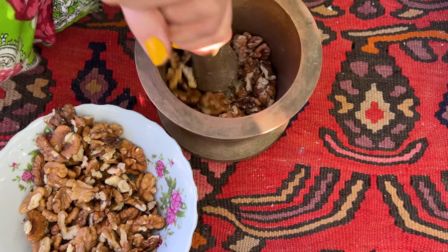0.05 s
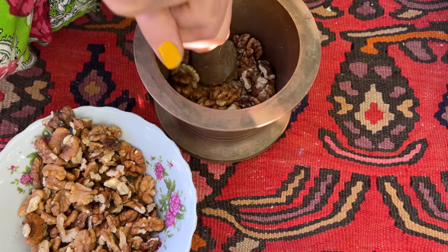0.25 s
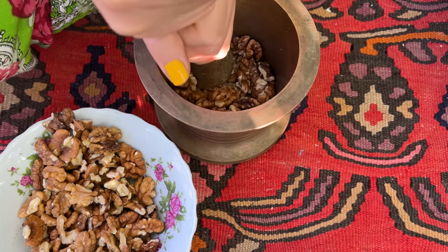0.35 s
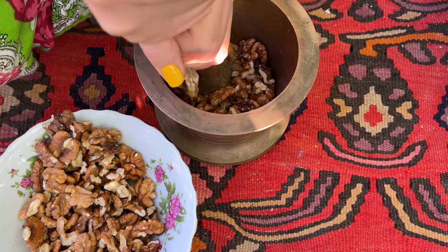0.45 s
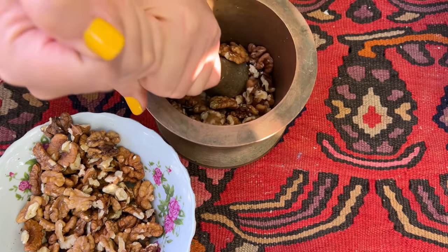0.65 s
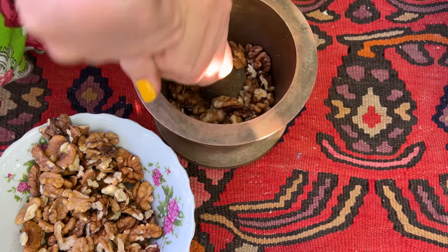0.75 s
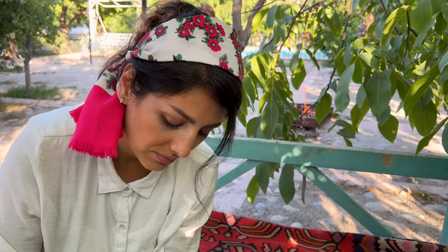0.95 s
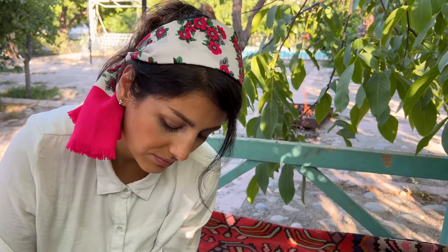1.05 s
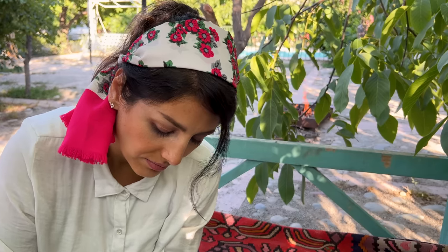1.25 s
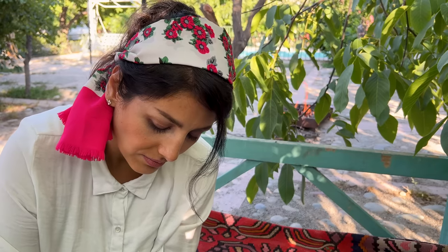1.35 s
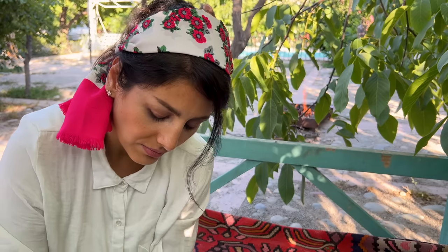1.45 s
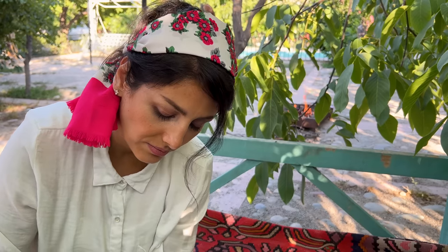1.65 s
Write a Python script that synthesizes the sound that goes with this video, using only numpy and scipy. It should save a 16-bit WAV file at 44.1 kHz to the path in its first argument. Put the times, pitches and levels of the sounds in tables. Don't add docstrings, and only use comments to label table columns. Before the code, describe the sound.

A pestle strikes a brass mortar of nuts, one hard scraping clang ringing over crunching shells

```python
import sys
import numpy as np
from scipy import signal
from scipy.fft import rfft, irfft, next_fast_len
from scipy.io import wavfile
from scipy.ndimage import uniform_filter1d, map_coordinates

SR = 44100
rng = np.random.default_rng(int(sys.argv[2]) if len(sys.argv) > 2 else 0)


def decibels_to_gain(level_db):
    exponent = np.asarray(level_db, float) / 20
    return 10 ** exponent


def wav_record(signal):
    frames = np.transpose(np.atleast_2d(signal))
    bounded = np.clip(frames, -1, 1)
    quanta = np.round(bounded * 32767).astype(np.int16)
    wavfile.write(sys.argv[1], SR, quanta)


N = 74970
LAG_S = 0.00017
SHADE_HZ = 7250


def unit(x):
    return x / np.sqrt(np.mean(x ** 2) + 1e-20)


def along(points, hz):
    f, v = np.transpose(points)
    return np.interp(np.log(hz + 1), np.log(f + 1), v)


def curve(rows):
    s, v = np.transpose(rows)
    return np.interp(np.arange(N) / SR, s, v)


def wobble(rate):
    return map_coordinates(rng.standard_normal(size=1000), [np.arange(N) * rate / SR])


def filtered(x, response):
    m = next_fast_len(N + SR // 2)
    return irfft(rfft(x, m) * response(np.fft.rfftfreq(m, 1 / SR)), m)[..., :N]


def placed(x, pan_db, lag_s):
    side = np.array([[1], [-1]])
    louder = x * decibels_to_gain(side * pan_db / 2)
    return filtered(louder, lambda hz: np.exp(1j * np.pi * np.minimum(hz, SHADE_HZ) * lag_s * side))


def noise(spectrum, alike):
    a, b = filtered(rng.standard_normal((2, N)), lambda hz: decibels_to_gain(along(spectrum, hz)) * (hz > 18))
    angle = np.arccos(np.clip(alike, 0, 1)) / 2
    middle, sides = np.cos(angle) * a, np.sin(angle) * b
    return unit(np.array([middle + sides, middle - sides]))


def grains(s, hz, gain, cycles):
    k = np.arange(96)
    age = k / SR * hz[:, None] / cycles
    envelope = np.e * age * np.exp(-age)
    wave = gain[:, None] * np.sin(2 * np.pi * hz[:, None] * k / SR) * envelope
    places = (s * SR).astype(int)[:, None] + k
    return np.bincount(places.ravel(), wave.ravel(), N + SR)[:N]


def struck_tone(s, hz, db, t60, rise_s):
    u = np.maximum(np.arange(N) / SR - s, 0)
    return decibels_to_gain(db - 60 * u / t60) * np.sin(2 * np.pi * hz * u) * (1 - np.exp(-u / rise_s))


# [pitch_hz, level_db]
AIR_COLOUR = [(150, -1.5), (400, -2.5), (900, -10), (2000, -22.5), (4000, -24), (16000, -55)]


def air():
    return decibels_to_gain(-59 + 2.6 * wobble(8.58)) * noise(AIR_COLOUR, 0.1)


def echo(x):
    t = np.arange(SR // 2) / SR
    tail_t60 = 0.14
    tail = rng.standard_normal(size=(2, len(t))) * decibels_to_gain(-60 * t / tail_t60) * (t > .006)
    wash = signal.fftconvolve(x, tail / np.linalg.norm(tail[0]), axes=1)[:, :N]
    return decibels_to_gain(-11) * wash


# [time_s, level_db]
RUG_PUSH = [(0, -50.5), (.3, -51), (.45, -43), (.554, -56), (.64, -47), (.776, -53.5), (1.324, -55.5),
            (1.392, -45.5), (1.43, -54.5), (1.7, -55.5)]
# [pitch_hz, level_db]
RUG_COLOUR = [(20, -31), (35, -14), (86, 0.5), (115, -2.5), (200, -13), (300, -20), (500, -38)]


def rug():
    push = decibels_to_gain(curve(RUG_PUSH) + 4.2 * wobble(30.08))
    return noise(RUG_COLOUR, 0.93) * push * decibels_to_gain([[.6], [-.6]])


# [start_s, pitch_hz, level_db]
THUMPS = [
    (0.319, 76.4, -34.5),
    (.432, 119, -43),
    (.458, 69.2, -26.5),
    (.612, 81.6, -30.5),
    (.655, 90, -35.5),
    (.712, 87, -39),
    (1.491, 94, -47),
]


def thumps():
    return sum(struck_tone(s, hz, db, t60=0.14, rise_s=0.0046) for s, hz, db in THUMPS)


# [start_s, level_db]
KNOCKS = [
    (1.3782, -28.5),
    (1.3855, -31),
    (1.412, -67),
    (1.468, -42.5),
    (1.4845, -35),
]
# [pitch_hz, level_db, t60_s]
BOARDS = [(108.4, -12, 0.12), (714, 1.1, 0.048), (792.5, -1, 0.026), (975, -6.5, 0.015),
          (1056, -13.5, 0.017), (1370, -33, 0.0051), (4060, -12, 0.02), (4290, -10.5, 0.03)]


def deck():
    out = np.zeros(N)
    for s, db in KNOCKS:
        for hz, level, t60 in BOARDS:
            out += struck_tone(s, hz, db + level + rng.normal(0, 3.4), t60, rise_s=0.00047)
    return placed(out, 0.062, -0.00019)


# [start_s, peak_level_db, pitch_hz, spread_s]
CRACKS = [(0.034, -55, 4100, 0.007), (.054, -27.5, 10100, 0.0019), (0.061, -36, 8800, 0.0035),
          (.1, -31.5, 12100, 0.0038), (0.227, -35, 7300, 0.0055), (.379, -34, 16000, 0.0022),
          (.396, -33, 9300, 0.0019), (.409, -43, 12000, 0.0035), (.4185, -22, 8800, 0.0027),
          (0.421, -33.5, 2200, 0.0076), (.428, -25, 11200, 0.0028), (.478, -40, 10280, 0.0028),
          (.496, -37.5, 9200, 0.0018), (.529, -32.5, 11500, 0.0032), (.549, -25, 12700, 0.0045),
          (0.5564, -33.5, 11000, .001), (0.5608, -15, 11540, 0.00038), (.561, -38.5, 3460, 0.00062),
          (0.57, -49, 10200, 0.0024), (0.5916, -29, 10500, 0.0013), (.613, -37, 12200, .003),
          (0.647, -36, 9000, 0.009), (.66, -25, 13200, 0.0023), (.66, -33, 3130, 0.0033),
          (.732, -49, 5630, 0.0025), (.747, -41, 5500, 0.0035), (.765, -44.5, 3040, 0.0022),
          (.804, -37, 12010, 0.003), (.8045, -51, 5000, 0.0018), (.815, -45.5, 2740, 0.012),
          (.845, -50, 2800, 0.01), (.86, -47, 6160, 0.002), (.8685, -44.5, 9100, .0015),
          (1.063, -46.5, 11000, 0.0023), (1.0754, -32.5, 6560, .0008), (1.081, -49, 7500, 0.0043),
          (1.09, -46.5, 6800, 0.004), (1.122, -37.5, 13900, 0.0038), (1.146, -45, 5870, 0.0036),
          (1.169, -41.5, 7050, 0.0028), (1.209, -43, 4597, 0.0036), (1.257, -41.5, 8900, 0.0029),
          (1.34, -35, 13000, 0.0034), (1.37, -31, 13800, 0.0084), (1.555, -41, 13500, 0.0055),
          (1.62, -52, 8100, 0.0022), (1.641, -44, 8600, 0.0069)]


def cracks():
    s, db, hz, spread = np.transpose(CRACKS)[:, :, None]
    late, tone, small = np.moveaxis(rng.random(size=(len(CRACKS), 60, 3)), -1, 0)
    pitch = np.clip(hz * 2 ** (2.36 * tone - 1.7), 500, 16500)
    start = s + 2.5 * spread * (late ** 1.3 - .2)
    gain = decibels_to_gain(db - 3.5 - 15.5 * small - 6.5 * late) * (pitch / hz) ** .9
    return grains(start.ravel(), pitch.ravel(), gain.ravel(), cycles=1.19)


def grit():
    when, tone, small = rng.random(size=(3, 1500))
    gain = decibels_to_gain(-3.5 * np.log(small + 0.017))
    return unit(grains(when * N / SR, 3000 * 2 ** (2.5 * tone), gain, cycles=0.99))


# [time_s, level_db]
GRIND = [(0, -56.5), (.04, -48), (.12, -51), (.2, -53.5), (.4, -60), (.6, -48), (.7, -57), (.9, -62),
         (1.02, -72), (1.1, -64), (1.25, -64), (1.35, -51.5), (1.4, -56.5), (1.44, -78), (1.48, -59),
         (1.56, -54.5), (1.63, -75), (1.7, -95)]
# [pitch_hz, level_db]
RUSTLE_COLOUR = [(400, -29), (1000, -6), (2500, 5.5), (5000, -2.5), (9000, -1), (12000, -5.5), (16000, 1.5)]


def nuts():
    snaps = cracks()
    crumbs = decibels_to_gain(-7.5) * grit()
    effort = decibels_to_gain(curve(GRIND) - 2 + 3.42 * wobble(21.94) + 1.7 * wobble(90))
    rustle = unit(filtered(rng.standard_normal(N), lambda f: decibels_to_gain(along(RUSTLE_COLOUR, f))))
    bed = effort * (rustle + crumbs)
    push = effort * rng.standard_normal(N) + 0.033 * snaps
    answer = ring(np.arange(SR // 2) / SR, 0.78, .1, 0.047)
    hum = decibels_to_gain(-1) * signal.fftconvolve(push[None], answer / np.linalg.norm(answer[0]), axes=1)[:, :N]
    return placed(snaps, 3.0, LAG_S) + placed(bed, 6.9, LAG_S) + hum


SCRAPE_S = .2332
# [start_s, pitch_hz, level_db, t60_s]
TOUCHES = [(.661, 4097, -51, .5), (.661, 4931, -62, .4), (.804, 1780, -40, 0.027),
           (.829, 2200, -44.5, 0.055), (.868, 6514, -54.5, 0.081), (.868, 8899, -55, 0.14),
           (.868, 4931, -59, 0.37), (.868, 5060, -74.5, .45), (0.9622, 4097, -41, 0.37),
           (1.51, 2736, -63, 1.7), (1.543, 4928, -54.5, .35), (1.56, 5612, -64.5, 0.2)]
# [pitch_hz, t60_s]
PESTLE = [(7510, .08), (8791, .3), (9399, .23), (9728, .2), (10400, .2), (11500, .15), (11950, .3),
          (12190, .3), (14800, .2), (15200, .2), (15600, .15)]
PESTLE_DB = [-41, -46, -55, -36, -40, -49, -43, -57, -46, -53, -50]


def touches():
    pestle = [(SCRAPE_S, hz, db, t60) for (hz, t60), db in zip(PESTLE, PESTLE_DB)]
    tones = sum(struck_tone(s, hz, db, t60, rise_s=0.0005) for s, hz, db, t60 in list(TOUCHES) + pestle)
    return placed(tones, 5, LAG_S)


# [pitch_hz, level_db]
SCRAPE_COLOUR = [(200, -15.5), (350, -3), (700, 6), (2000, -1), (3500, -9), (9000, -13.5), (13000, -30)]


def scrape():
    u = np.maximum(np.arange(N) / SR - SCRAPE_S, 0)
    lift_db = -900 * np.maximum(u - 0.057, 0)
    level_db = -28.5 - 60 * u / 0.25 + lift_db + 4.9 * wobble(150.6)
    return noise(SCRAPE_COLOUR, 0.8) * decibels_to_gain(level_db) * (u > 0)


# [start_s, level_db]
TICKS = [
    (0.032, -34),
    (0.2335, -2.2),
    (0.87, -13),
    (0.9618, -6),
    (0.9699, -4.5),
    (1.589, -25),
    (1.599, -24),
    (1.621, -25),
]


def ticks():
    s, db = np.transpose(TICKS)
    parts = [(500, 38.5), (1000, 27.3), (2000, 23.7), (5000, 33)]  # (Hz, loss dB)
    clicks = sum(grains(s, hz + 0 * s, decibels_to_gain(db - loss_db), cycles=0.6) for hz, loss_db in parts)
    return placed(clicks, 7.3, LAG_S)


# [pitch_hz, twin_above_by_hz, t60_s]
BOWL = [(1163, 11, .85), (1170, 20, .24), (2725, 11.5, 1.05), (4099, 6.2, .6), (4931, 15, .45),
        (5064, 8, .3), (5612, 16, .6), (6503, 39, .3), (6740, 20, .2), (7073, 40, .28), (7867, 33, .17),
        (8431, 40, .12), (11760, 30, .22), (12490, 12, .4)]
# [hard_blow_db, soft_tap_db, twin_share_hard (signed), twin_share_soft (signed),
# left_over_right_db, twin_turn_between_ports_rad]
ANSWER = [(-26.5, -32, 2, 0.85, 4.4, 1.33), (-12.5, -59, 0.61, .3, 2.6, 0.9),
          (-23.5, -62.5, 0.47, 7.5, 3.8, 1.54), (-19.5, -57.5, -0.71, 1.45, 9.7, -0.14),
          (-23.5, -60, -0.42, 0.4, 3.5, 3), (-42.5, -60, .3, 0.22, 2.2, .3),
          (-39.5, -56.5, 0, 0.17, 12.3, -0.39), (-31, -63, 2, .55, 2.2, 1), (-35, -71, 0.6, .3, 2.2, .3),
          (-33.5, -71, 0.4, .3, 7, 0.47), (-30.5, -75, 0.3, .3, .1, 0.2), (-25.5, -76, 0, .3, 3.1, .3),
          (-41, -77, 0, .3, 0.91, .3), (-41.5, -85, 0.1, .3, .1, -5)]


def ring(t, hard, twin_db, spin):
    hz, split, t60, loud, soft, share, tap_share, pan, turn = np.hstack([BOWL, ANSWER]).T[:, :, None]
    twin = (hard * share + (1 - hard) * tap_share) * decibels_to_gain(twin_db)
    ring_t60 = t60 * (1 - 0.12 * hard)
    rise_s = hard * 0.0057 + 0.000077
    out = []
    for side in (1, -1):
        u = np.maximum(t + side * LAG_S / 2, 0)
        pan_db = side * (pan + (1 - hard) * 6.5) / 2
        level = decibels_to_gain(hard * loud + (1 - hard) * soft - 60 * u / ring_t60 + pan_db)
        phase = 2 * np.pi * hz * u - side * np.pi * LAG_S * np.maximum(hz - SHADE_HZ, 0)
        twin_phase = phase + 2 * np.pi * split * u + spin + side * turn / 2
        pair = np.sin(phase) + twin * np.sin(twin_phase)
        out.append((level * pair).sum(axis=0) * (1 - np.exp(-u / rise_s)))
    return np.array(out)


# [start_s, level_db, hardness (0-1), twin_level_db, sideways_spin_rad]
BLOWS = [
    (.03, -28.5, 0.88, -2.5, 1.1),
    (0.2338, -0.48, 1, 0.16, -0.36),
    (0.868, -14.5, 0.17, -24, 3),
    (0.9617, -5.5, 0.08, 0.5, -2),
    (0.9701, -8.5, 0.17, 2.7, -3),
]


def bowl():
    t, out = np.arange(N) / SR, np.zeros((2, N))
    for s, db, hard, twin_db, spin in BLOWS:
        k = int((s - .001) * SR)
        out[:, k:k + SR] += decibels_to_gain(db) * ring(t[k:k + SR] - s, hard, twin_db, spin)
    return out + scrape() + touches() + ticks()


def scene():
    near = bowl() + nuts() + deck()
    return near + echo(near) + rug() + thumps() + air()


def gated(x):
    hz, t, z = signal.stft(x, SR, nperseg=1024)
    power = (abs(z) ** 2).mean(axis=0)
    band = uniform_filter1d(uniform_filter1d(power, size=9, axis=0), size=3, axis=1)
    floor = decibels_to_gain(2 * -100) + decibels_to_gain(2 * -55) * power.max(axis=0)
    passed = 1 / (1 + (floor / (abs(band) + 1e-20)) ** 6)
    keep = np.where(hz[:, None] > 2200, passed, 1)
    return signal.istft(z * keep, SR, nperseg=1024)[1][:, :N]


# [pitch_hz, level_db]
PORTS = [(6000, 0.03), (9000, 0.15), (12000, 2), (15800, 3), (16500, -47)]
# [pitch_hz, width_hz, level_db]
NOTCHES = [(10170, 590, -15), (13800, 650, -20)]


def ports(x):
    def response(hz):
        dips = sum(db * np.exp(-((hz - centre) / width) ** 2) for centre, width, db in NOTCHES)
        return decibels_to_gain(along(PORTS, hz) + dips)
    return filtered(x, response)


def band_limit(x):
    return signal.sosfilt(signal.butter(12, 17000, fs=SR, output="sos"), x)


def record(dry):
    mix = gated(ports(dry))
    return band_limit(mix)


dry = scene()
out = record(dry)
wav_record(out)
```